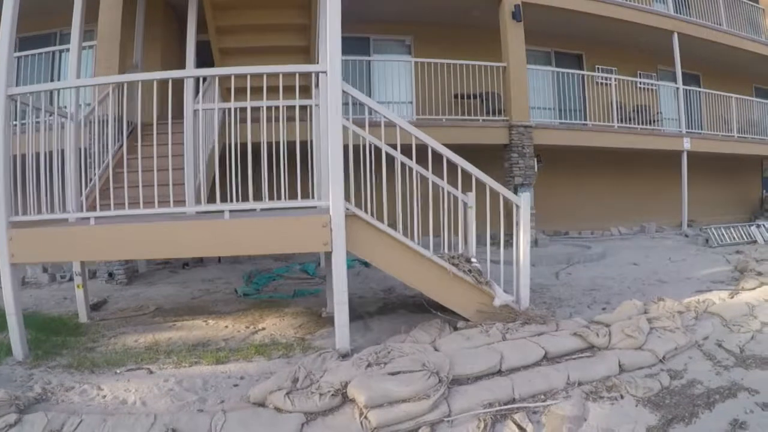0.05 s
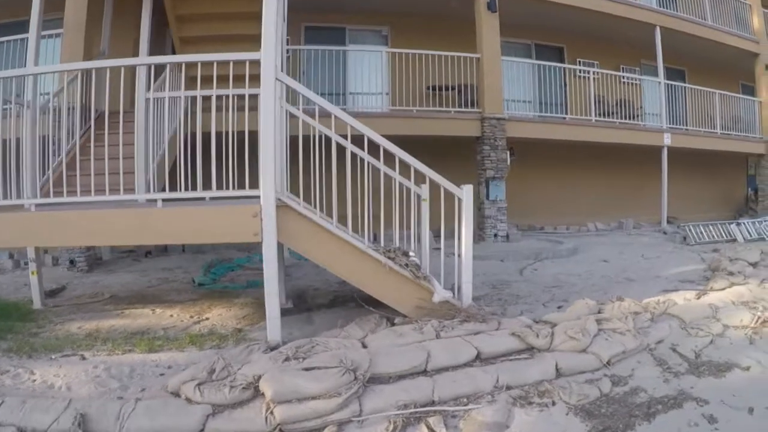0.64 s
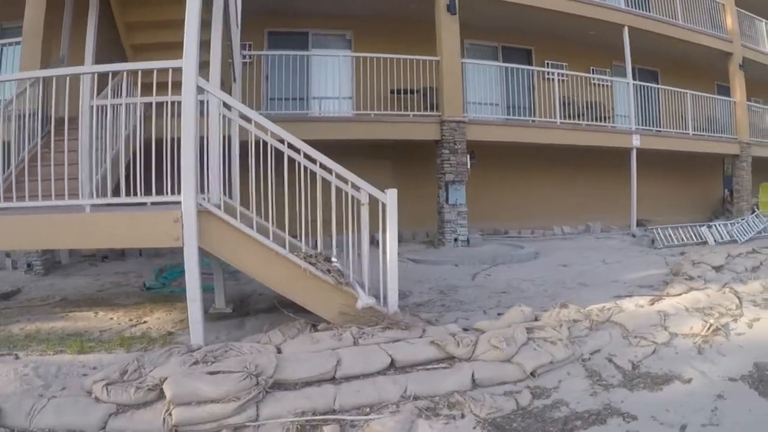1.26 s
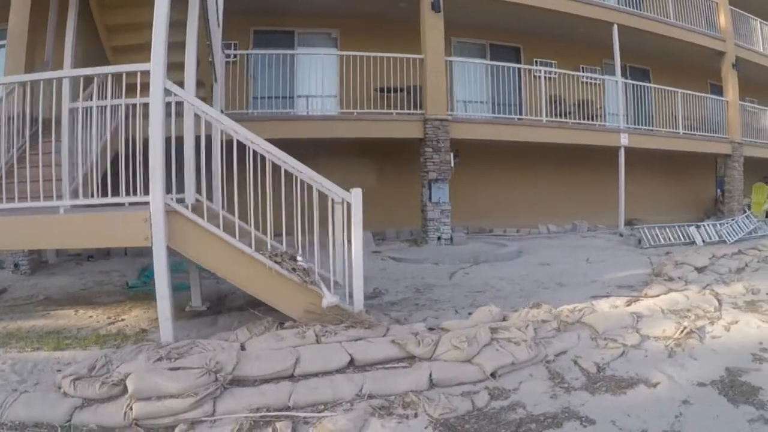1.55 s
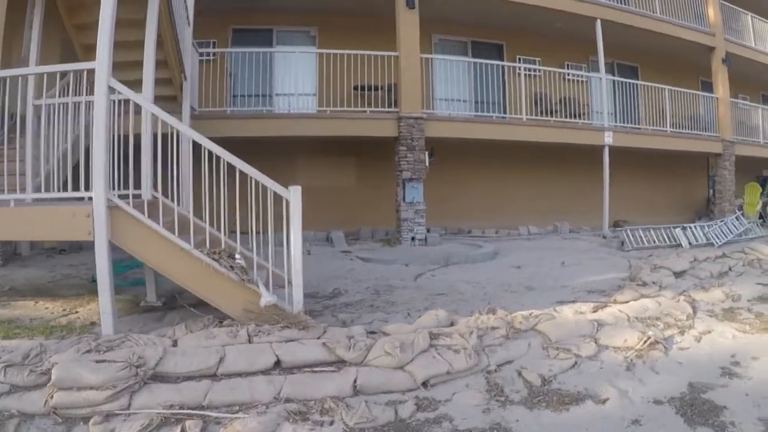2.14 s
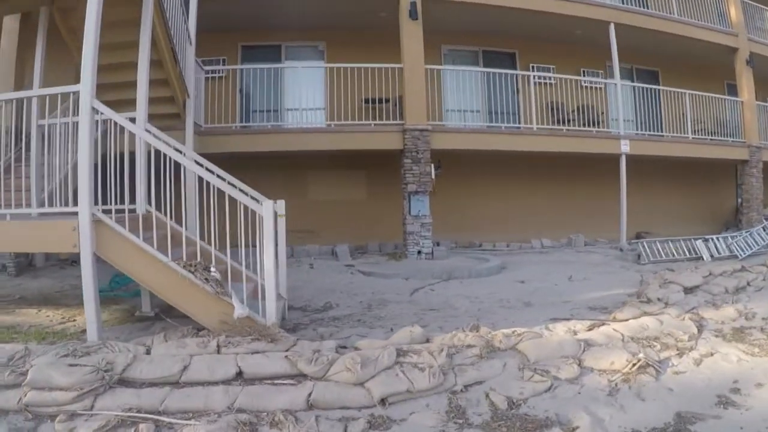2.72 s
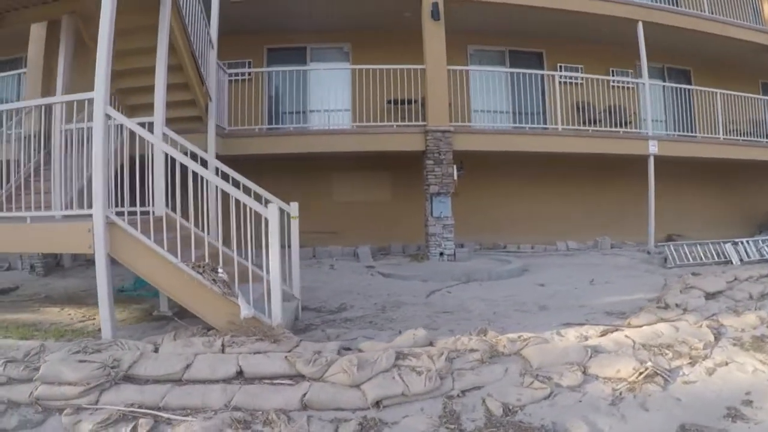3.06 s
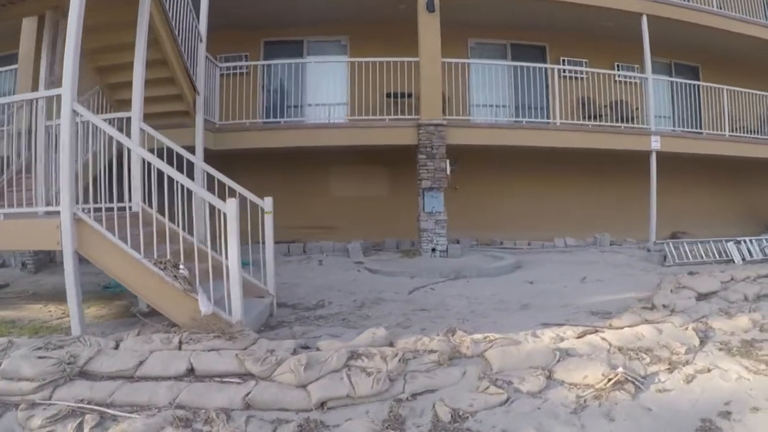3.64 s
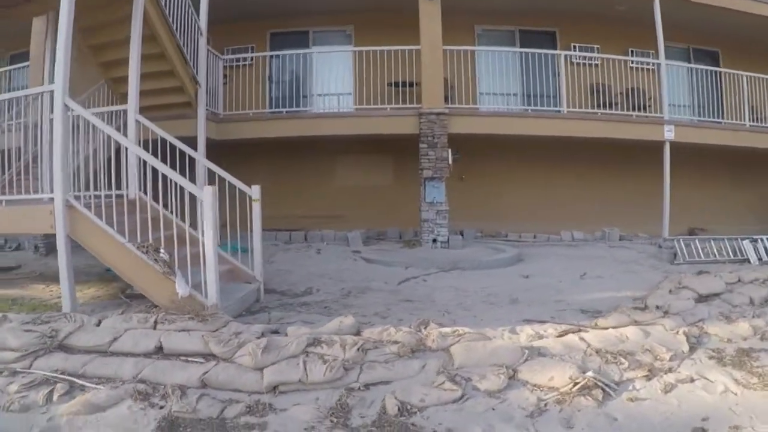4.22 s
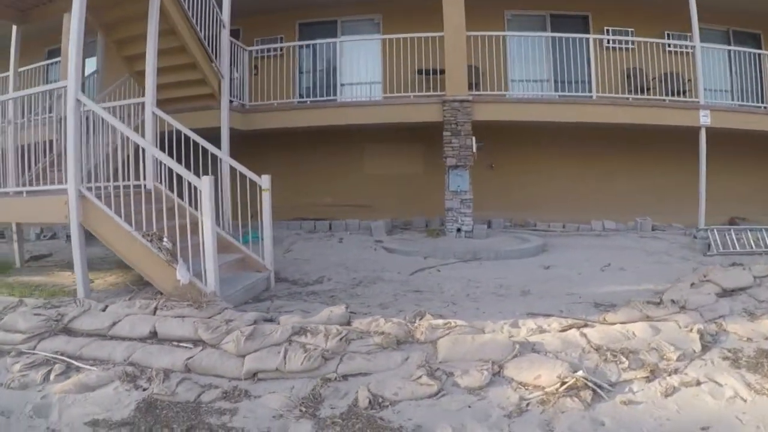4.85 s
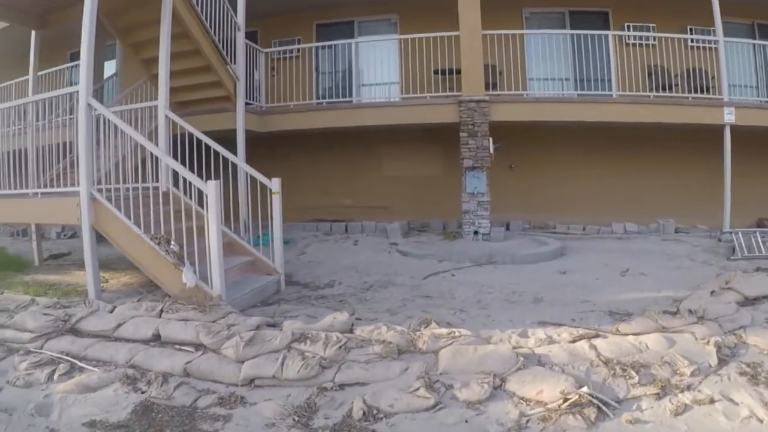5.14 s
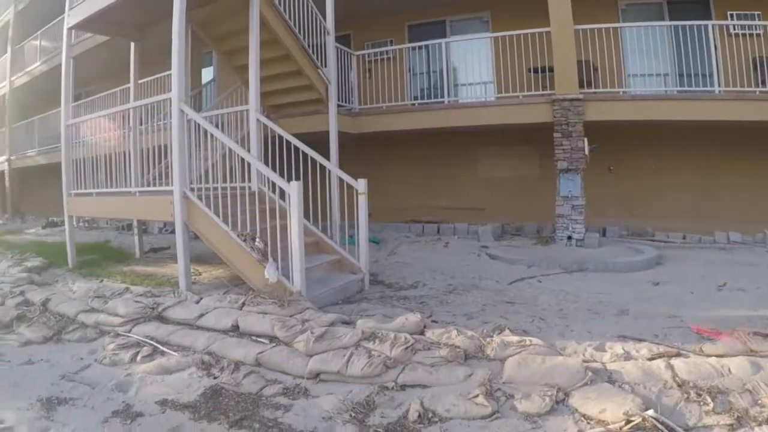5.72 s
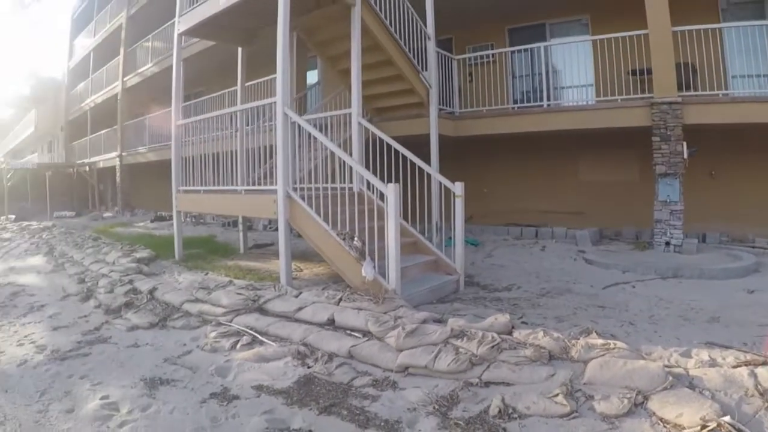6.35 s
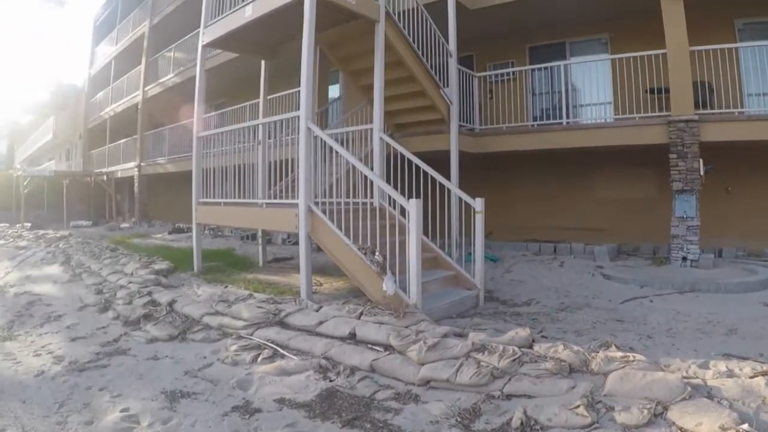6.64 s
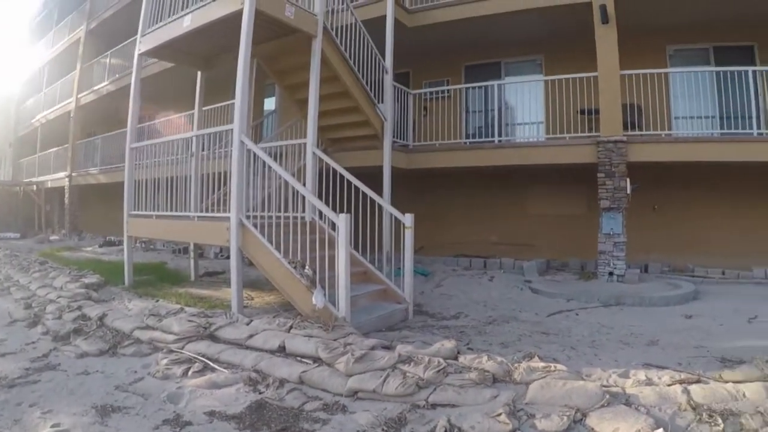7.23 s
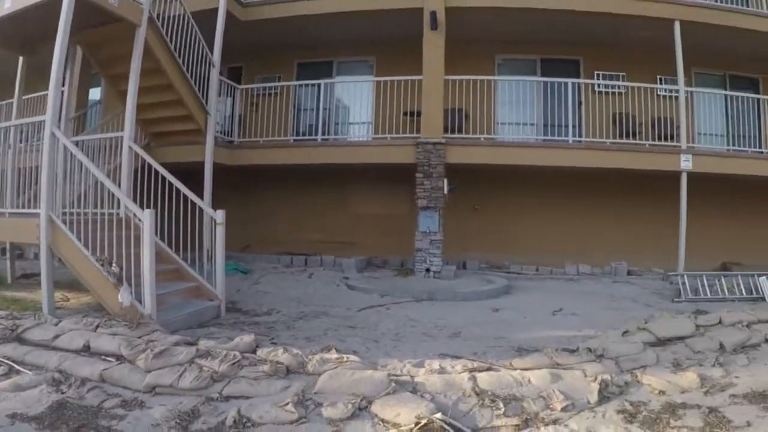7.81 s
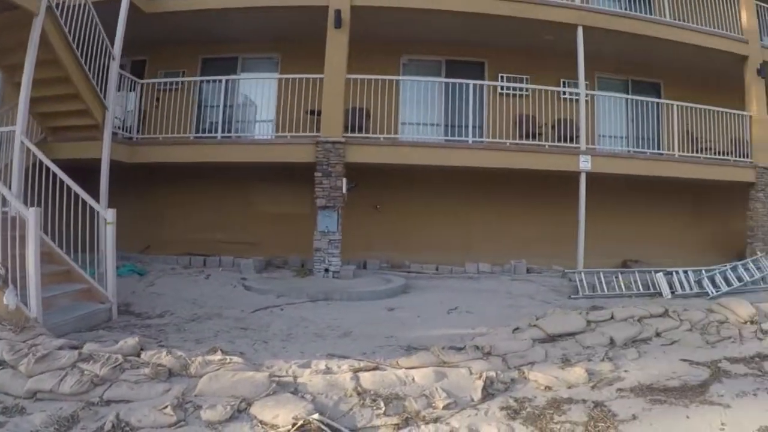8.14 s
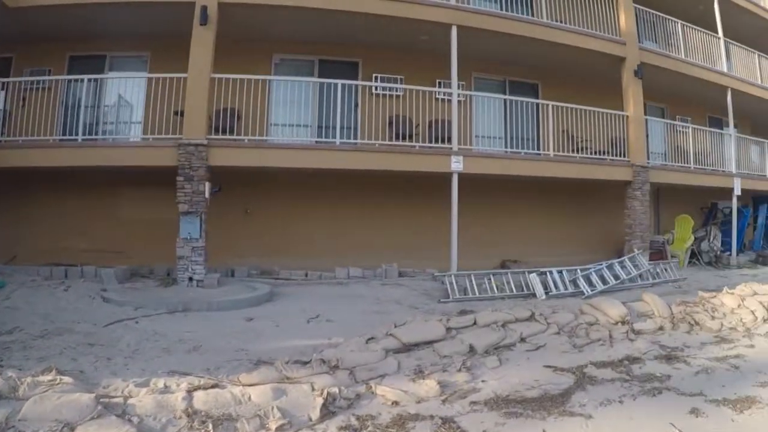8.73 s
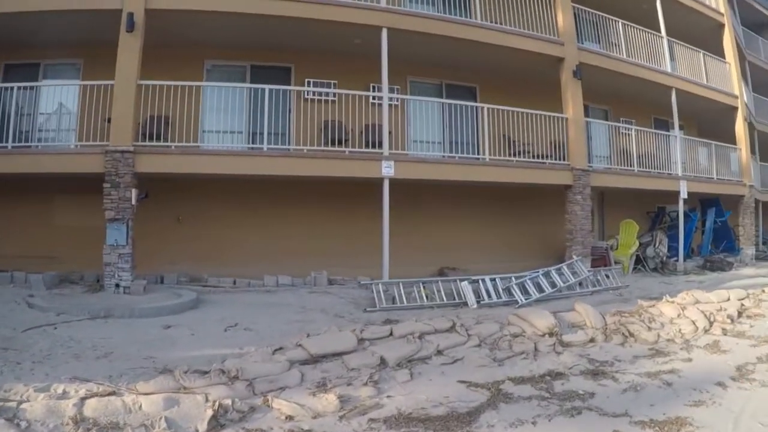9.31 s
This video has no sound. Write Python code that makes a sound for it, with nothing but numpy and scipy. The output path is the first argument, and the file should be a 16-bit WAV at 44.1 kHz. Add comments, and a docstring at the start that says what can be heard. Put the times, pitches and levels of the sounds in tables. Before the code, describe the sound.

Short rasping croaks recur steadily outdoors as gusts rumble and bump the microphone, with camera creaks and distant sea wash.

```python
"""A walk over sand in front of a beach building. From the start a dry rasp, most likely a tree frog, repeats on
the left at walking pace: quick pulses ring its throat and echo from the walls. Surf and a low drone lie behind,
and the camera's case creaks in the hand. After about two seconds the microphone starts to thump, wind rumbles
on it, and the case knocks. Past halfway, as a stronger gust arrives, a small bird twitters; then a farther one
pips five times."""
import sys
import numpy as np
from scipy import signal
from scipy.fft import rfft, irfft
from scipy.io import wavfile

SR = 44100
rng = np.random.default_rng(int(sys.argv[2]) if len(sys.argv) > 2 else 0)


def waveform_to_disk(signal):
    """Save audio, clipped to [-1, 1], as 16-bit WAV at the path in sys.argv[1]."""
    frames = np.transpose(np.atleast_2d(signal))
    scaled = np.clip(frames, -1, 1) * 32767
    samples = np.round(scaled).astype(np.int16)
    wavfile.write(sys.argv[1], SR, samples)


N = 413216
T = np.arange(N) / SR
HZ = np.maximum(np.fft.rfftfreq(N, 1 / SR), 1)

# The frog's calls, with a few soft answers between them: (start [s], length [s], level [dB],
# swell [dB], upward scrape [s], strongest ring [Hz], share sent to the walls [dB], sizzle [dB])
FROG_CALLS = [(-.09, 0.1, -41, 9.5, 0.054, 1770, 7, -61), (0.458, 0.12, -37.5, 3, .022, 1800, 3.5, -53),
              (1.093, 0.14, -38, 7, .06, 1900, 3, -54.5), (1.771, .128, -40, 4.5, 0.039, 2270, 3.5, -59),
              (2.187, 0.078, -48.5, 3, 0.015, 2050, -18, -75), (2.407, .12, -36, 3, 0.032, 2100, -1.5, -58),
              (2.843, 0.065, -48.5, 4, 0.019, 1980, -8, -75),
              (3.022, 0.12, -30.5, 7, 0.029, 2000, -3, -56.5),
              (3.612, 0.13, -33, 4.5, 0.029, 2050, -3.5, -58.5),
              (4.206, 0.12, -31, 5.5, 0.025, 2100, -4.5, -57),
              (4.784, 0.12, -31, 6, 0.027, 1900, -2.5, -57), (5.396, 0.12, -33, 3, .036, 1950, -3.5, -60.5),
              (5.993, .13, -31.5, 6, 0.034, 2010, -3.5, -59), (6.601, 0.13, -33.5, 5, .032, 2050, -2, -64),
              (7.193, 0.1147, -34, 2, 0.0057, 1900, -2.5, -67),
              (7.527, 0.087, -50.5, 4, 0.018, 2000, -4, -75),
              (7.782, .13, -33.5, 5.5, 0.056, 2090, -3.5, -62.5),
              (8.168, 0.092, -52, 3, .026, 2120, -9, -75), (8.396, 0.12, -35.5, 3.5, 0.025, 2040, -2, -66),
              (8.728, .14, -52.5, 3.5, 0.02, 1960, -10, -75), (8.972, 0.14, -37.5, 7, 0.034, 1980, 2, -64)]
# How the throat rings after one pulse: (frequency [Hz], level [dB])
THROAT_COLOUR = [(200, -31.5), (392, -1), (520, -13.5), (700, -12.5), (1050, -5), (1280, -9), (1405, 1.5),
                 (1550, -4), (1680, 2), (1820, 2.5), (2040, -1), (2200, -3), (2520, -7), (2850, -21),
                 (3350, -21.5), (4100, -32), (7000, -56), (12000, -89)]
# The walker turns away from the frog and back, shading the right ear: (time [s], loss [dB])
HEAD_SHADE = [(0, 35), (1.1, 41), (1.8, 26), (2.4, 13), (3.1, 8.5), (5.4, 33), (6, 20), (7.8, 31),
              (8.4, 10), (9.37, 15)]
# Airy hiss on a call: (frequency [Hz], level [dB])
WHEEZE_COLOUR = [(200, -18), (500, 7), (1200, 15), (1900, 0), (2800, 1), (3300, 0.5), (3700, -9.5),
                 (4200, -24), (10000, -49)]
# Thin, high sizzle on a call: (frequency [Hz], level [dB])
SIZZLE_COLOUR = [(3800, -22), (4400, -19.5), (5100, 0.5), (5450, -1.5), (5950, 1.5), (6400, -13.5),
                 (7200, -6), (10000, -39)]
# Tone of the echo from the walls: (frequency [Hz], level [dB])
WALL_COLOUR = [(250, -14), (900, 7), (1600, 1), (1900, -1), (2170, 6), (2600, -3), (3200, 6.5), (6000, 4.5),
               (10000, 5)]
# Tone of the sea: (frequency [Hz], level [dB])
SURF_COLOUR = [(40, -15), (112, -41), (150, -9), (230, 1), (290, -6.5), (500, -12), (650, -16),
               (1000, -18.5), (1450, -21.5), (2700, -28), (4300, -32.5), (7000, -31.5), (10500, -34.5),
               (14500, -49)]
# How wide the sea sounds: (frequency [Hz], spread [dB]).
# Spread is the level of the part opposed in the two ears against the part they share.
SURF_SPREAD = [(45, 2.5), (110, 1), (155, -14), (210, -7.5), (370, -4), (600, 4), (1260, 5), (2300, -1),
               (4200, -3), (7800, 0.5), (14000, 0.5)]
# Rise and fall of the sea's wash: (time [s], level before the boost [dB])
SURF_SWELL = [(0.0, -52), (2.27, -50), (5.22, -52), (5.56, -49.5), (6.99, -52), (7.93, -49.5), (8.61, -52),
              (9.37, -50)]
# Change in the middle tones of the wash: (time [s], gain [dB])
SURF_MID_GAIN = [(0, 2.5), (2.4, -0.5), (3.2, 0.22), (6.3, 0.2), (7.8, 0.06), (9.37, 1.9)]
# Noise bands of the low drone, plus a faint high one: (centre [Hz], width [Hz], level [dB], spread [dB])
DRONE_BANDS = [(154, 29, -51, -5.5), (156.9, 2.8, -53, -9), (178.2, 1.5, -58.5, -15),
               (191.7, 43, -54, -9.5), (379, 37, -65.5, -3), (6260, 380, -78, 1)]
# Rise and fall of the drone: (time [s], gain [dB])
DRONE_GAIN = [(0, 2.5), (1, 4), (3, 2), (4, 3.5), (5.7, 7.5), (6.5, 2), (7.5, 0.5), (8.9, 7), (9.37, 5)]
# The grip creaks on the camera's case: (start [s], length [s], level [dB])
GRIP_CREAKS = [(0.71, .028, -46), (1.923, 0.018, -37.5), (2.1, .018, -36), (2.124, .016, -39),
               (2.155, 0.049, -36), (2.215, .052, -35.5), (4.093, .018, -46), (5.463, .02, -42),
               (5.54, .022, -40), (5.774, 0.021, -44.5), (5.853, .016, -44), (5.893, 0.048, -40),
               (7.975, .04, -42), (8.01, .036, -46)]
# How the case rings: (frequency [Hz], level [dB])
CASE_COLOUR = [(200, -35), (550, -16), (780, -1.5), (950, 0.5), (1080, -3), (1220, -4), (1350, -18),
               (2200, -52), (7000, -100)]
# Low thumps on the microphone: (time [s], level [dB], final pitch [Hz], rise time [s])
MICROPHONE_THUMPS = [(1.846, -23.5, 173, 0.0041), (1.974, -25, 165, 0.0059), (2.073, -11, 305, .0016),
                     (2.083, -14, 200, 0.0068), (2.1005, -10, 160, 0.01), (2.202, -20.5, 228, 0.0036),
                     (2.22, -16, 111, 0.0049), (4.7275, -11, 169, 0.0062), (4.739, -7.5, 154, .0048),
                     (5.63, -16.5, 225, 0.0068), (5.728, -13.5, 190, 0.0049), (5.78, -13, 184, 0.0068),
                     (6.094, -12, 79, 0.0072), (6.158, -13, 76.6, 0.0066), (6.224, -12.5, 97, 0.0072),
                     (6.259, -15, 60, 0.015), (6.392, -10, 94.3, 0.0088), (6.404, -19, 186, 0.0046),
                     (6.422, -10, 108, 0.0074), (6.601, -7, 99, 0.0051), (7.458, -14.5, 56.6, .011),
                     (7.969, -19, 150, 0.0053), (8.034, -18, 194, 0.0058), (8.124, -17, 115, 0.0026),
                     (8.22, -12, 154, 0.0053)]
# A calm, one gust, a lull, a stronger gust: (time [s], level [dB])
WIND_LEVEL = [(0, -58), (.9, -62), (1.6, -69), (2.03, -61), (2.12, -42), (2.45, -37), (3.3, -42),
              (3.6, -40), (4.65, -50), (5.45, -48.5), (5.72, -33.5), (6.2, -36.5), (6.6, -30),
              (6.78, -34.5), (7.6, -38), (8.42, -36), (9.03, -43), (9.37, -39)]
# Tone of the wind's rumble: (frequency [Hz], level [dB])
WIND_COLOUR = [(10, -27), (22, -5.5), (42, 0.5), (70, -1), (100, -2), (150, -9), (220, -18.5), (350, -28),
               (700, -46.5), (2000, -81)]
# How wide the wind sounds: (frequency [Hz], spread [dB])
WIND_SPREAD = [(25, 8.5), (60, 2.5), (125, -4.5), (250, 3), (600, 3)]
# Knocks on the case: (time [s], level [dB], hollow low ring against the case's ring [dB])
CASE_KNOCKS = [(2.074, -18, 3.5), (2.106, -22, 8), (4.728, -26, 11.5), (4.739, -20, -14), (5.635, -28, 4),
               (5.726, -28, 3), (6.161, -30, -6), (6.394, -34, -2), (6.424, -32, -1), (6.597, -33, 9),
               (7.967, -32, 2), (8.04, -34, 6), (8.223, -29, -4), (8.322, -30, 1)]
# A small bird's notes:
# (start [s], length [s], first pitch [Hz], last pitch [Hz], hoarseness [Hz], level [dB])
TWITTER_NOTES = [(5.527, 0.11, 5500, 5830, 380, -54.5), (5.65, 0.049, 6130, 6430, 260, -56),
                 (5.84, 0.03, 5200, 4830, 500, -56), (5.848, .11, 3950, 4260, 700, -50.5),
                 (6.077, .15, 6070, 5960, 520, -50), (6.168, .15, 6000, 5900, 560, -58.5),
                 (6.103, 0.25, 7100, 6970, 700, -58), (6.79, .13, 8600, 9500, 280, -64),
                 (6.9, 0.22, 9150, 8700, 280, -65)]


def from_db(db):
    """Turn decibels into a number to multiply by."""
    return 10 ** (np.asarray(db) / 20)


def rms_one(x):
    """Scale a signal so that its average power is one."""
    return x / np.sqrt(np.mean(x ** 2) + 1e-20)


def in_time(points):
    """Join (time, value) points with straight lines, giving a value for every sample."""
    return np.interp(T, *np.transpose(points))


def colour(points):
    """Join (frequency, level) points into a gain for every frequency."""
    hz, db = np.transpose(sorted(points))
    return from_db(np.interp(np.log(HZ), np.log(hz), db))


def hump(hz, width_hz):
    """Gain that favours one frequency and falls away on both sides."""
    return 1 / (1 + ((HZ - hz) / (.75 * width_hz)) ** 2)


def filtered(x, gain):
    """Turn each frequency of a sound up or down by its gain."""
    return irfft(rfft(x) * gain, N)


def noise(gain):
    """Random noise of a given tone colour, with a power of one."""
    return rms_one(filtered(rng.standard_normal(N), gain))


def wide(gain, spread):
    """Noise from all around: one part shared by both ears and one part opposed in them."""
    side = gain * spread
    side_level = np.sqrt(np.sum(side ** 2) / np.sum(gain ** 2))
    return noise(gain) + noise(side) * side_level * np.array([[1], [-1]])


def ringing(gain):
    """A filter with this gain that rings only after it is struck, like a real object."""
    cepstrum = irfft(np.log(gain), N)
    cepstrum[1:N // 2] *= 2   # move what would come before the strike to after it
    cepstrum[N // 2 + 1:] = 0
    return np.exp(rfft(cepstrum))


def ticks(phase):
    """One click each time the count of cycles passes a whole number."""
    return np.diff(np.maximum.accumulate(np.floor(phase)), prepend=-1)


def ears(pan_db):
    """Left and right gains that average one; a positive pan favours the left."""
    gains = from_db(np.array([pan_db, -pan_db]).reshape(2, -1) / 2)
    return gains / gains.mean(axis=0)


def add(out, start_s, x):
    """Mix a short sound in at a given time."""
    at = round(start_s * SR)
    first, last = max(at, 0), min(at + x.shape[-1], N)
    if last > first:
        out[..., first:last] += x[..., first - at:last - at]


def gliding_peak(x, hz, width_hz):
    """Keep a narrow band of a sound while the band's centre moves."""
    carrier = np.exp(2j * np.pi * np.cumsum(hz) / SR)
    decay = np.exp(-np.pi * width_hz / SR)
    return 2 * np.real(signal.lfilter([1 - decay], [1, -decay], x / carrier) * carrier)


def frog_pulses(rate_hz, jitter_cycles=.06, rebound_cycles=.443, rebound_db=-6.5, hiss_db=-3):
    """Uneven clicks, each with a weaker rebound and a burst of rubbing; also returns a pulsing hiss."""
    chance = rng.standard_normal((64, 3))
    cycles = np.cumsum(rate_hz) / SR
    strength, timing, rebound_timing = chance[cycles.astype(int)].T
    phase = cycles - .5 + jitter_cycles * timing
    rebounds = ticks(phase - rebound_cycles + jitter_cycles * rebound_timing)
    clicks = (ticks(phase) + from_db(rebound_db) * rebounds) * 15.122   # brings their power near one
    white = rng.standard_normal((2, N // 20))[:, :len(cycles)]
    burst = rms_one(np.exp(-2.2 * (phase % 1)))
    pulses = (clicks + from_db(hiss_db) * burst * white[0]) * from_db(-.2 * strength)
    return pulses, white[1] * np.sqrt(burst)


def frog(lead_s=.008, swell_s=.072, release_s=.02, climb_hz=318, sand_s=.001577, right_lag_s=.000475):
    """Pulses ring the throat and scrape upward; returns the sound at the ears and at the walls."""
    throat = rms_one(colour(THROAT_COLOUR))
    rim = rms_one(throat ** .5 * hump(2380, width_hz=720))   # the bright edge of a call
    throat_ring, rim_ring = (irfft(ringing(throat) * g, N)[:SR // 50] for g in (1, rim / throat))
    calls, air = np.zeros((3, N)), np.zeros((2, N))
    for start, length, level_db, swell_db, scrape_s, peak_hz, echo_db, sizzle_db in FROG_CALLS:
        shade_db = np.interp(start, *np.transpose(HEAD_SHADE))
        t = np.arange(int((lead_s + length + release_s) * SR)) / SR - lead_s
        progress = t / length
        # pulses quicken through a call; calls that swell more are slower
        pulses, hiss = frog_pulses(rate_hz=192.85 + 11.25 * progress - swell_db)
        ring = throat_ring + from_db(-7.5 - .32 * shade_db) * rim_ring   # duller when turned away
        tone = signal.fftconvolve(pulses, ring)[:len(t)]
        tone += from_db(-3) * gliding_peak(tone, peak_hz + climb_hz * (progress - .5), width_hz=300)
        opening = np.sin(np.pi / 2 * np.clip(t / scrape_s, 0, 1))
        speed = .62 + .38 * opening   # the scrape: pitch and pulse rate slide up together
        tone = rms_one(np.interp(np.cumsum(speed), np.arange(len(t)), tone))
        fade_in = np.clip((t + lead_s) / (lead_s + .79 * scrape_s), 0, 1)
        swell = from_db(swell_db * (np.clip(t / swell_s, 0, 1) - 1))
        fade_out = np.clip((length - t) / release_s + .5, 0, 1)
        effort = fade_in * swell * fade_out
        paths_db = np.array([[0], [-shade_db], [echo_db]])   # left ear, right ear, walls
        add(calls, start - lead_s, tone * effort * from_db(level_db + paths_db))
        if level_db > -46:   # only full calls wheeze and sizzle
            wheeze_db = -46 - .98 * start   # fades as the walk goes on
            add(air, start - lead_s, hiss * effort * opening * from_db([[wheeze_db], [sizzle_db]]))
    sand_bounce = 1 + from_db(-9) * np.exp(-2j * np.pi * HZ * sand_s) * hump(0, 2100)
    wheeze = rfft(air[0]) * rms_one(colour(WHEEZE_COLOUR))
    sizzle = rfft(air[1]) * rms_one(colour(SIZZLE_COLOUR))
    left, right, outward = rfft(calls) * sand_bounce + wheeze + sizzle
    right *= np.exp(-2j * np.pi * HZ * right_lag_s)
    return irfft([left, right], N), irfft(outward, N)


def wall_echoes(x, fade_60db_s=.56, first_s=.00062, build_s=.00057, front_delay_s=.085):
    """Echoes scatter off the balconies and die away; the building's front sends back one ringing echo."""
    age = np.maximum(T[:SR] - first_s, 0)
    tail = rng.standard_normal((2, SR)) * (1 - np.exp(-age / build_s)) * from_db(-60 * age / fade_60db_s)
    tail /= np.sqrt(np.sum(tail ** 2, axis=1, keepdims=True))
    scattered = signal.fftconvolve(filtered(x, colour(WALL_COLOUR))[None], tail, axes=1)[:, :N]
    front = filtered(x, hump(2190, width_hz=170) * np.exp(-2j * np.pi * HZ * front_delay_s))
    return (from_db(-9.5) * scattered + from_db(-8.5) * front) * ears(pan_db=1.5)


def surf(boost_db=4, waver_db=1.1, hiss_from_hz=2500, hiss_db=-48.5):
    """The wash of the sea swells and wavers while its high hiss stays even."""
    sea = wide(colour(SURF_COLOUR), colour(SURF_SPREAD))
    body = filtered(sea, 1 / (1 + (HZ / hiss_from_hz) ** 4))
    mid_change = filtered(body, hump(900, width_hz=500)) * (from_db(in_time(SURF_MID_GAIN)) - 1)
    level_db = in_time(SURF_SWELL) + boost_db + waver_db * noise(hump(0, 26))
    return (body + mid_change) * from_db(level_db) + (sea - body) * from_db(hiss_db)


def drone(lowest_hz=132):
    """Narrow bands of noise hum behind the surf, with the deepest bass cut away."""
    bass_cut = 1 / np.sqrt(1 + (lowest_hz / HZ) ** 16)
    bands = sum(from_db(level_db) * wide(hump(hz, width_hz) * bass_cut, from_db(spread_db))
                for hz, width_hz, level_db, spread_db in DRONE_BANDS)
    return bands * from_db(in_time(DRONE_GAIN))


def tap(gain):
    """The short ring of something tapped once, with a peak of one."""
    ring = irfft(ringing(gain), N)[:SR // 50]
    return ring / np.max(np.abs(ring))


def through_case(x, right_db=-2, lag_s=.00007):
    """The case shakes the two microphone openings in opposite ways, the right one weaker and later."""
    return np.array([x, -from_db(right_db) * np.interp(T - lag_s, T, x)])


def creaks(slips_per_s=500, jitter_cycles=.3):
    """The hand's grip gives way in runs of tiny, uneven slips that ring the camera's case."""
    out, case = np.zeros(N), tap(colour(CASE_COLOUR))
    for start, length, level_db in GRIP_CREAKS:
        t = T[:int(length * SR)]
        chance = rng.standard_normal((64, 2))
        timing, strength = chance[(t * slips_per_s).astype(int)].T
        slips = ticks(t * slips_per_s + jitter_cycles * timing) * strength
        fade = np.sqrt(np.sin(np.pi * t / length))
        creak = rms_one(signal.fftconvolve(slips, case)[:len(t)] * fade)
        add(out, start, creak * from_db(level_db))
    return out


def thumps(droop=.38, droop_s=.003, right_db=-7, lag_cycles=.43):
    """A thump strikes the left opening, then the sheltered right: a short swing falling in pitch."""
    out, t = np.zeros((2, N)), T[:SR // 8]
    for start, level_db, hz, rise_s in MICROPHONE_THUMPS:
        age = t / rise_s
        phase = 2 * np.pi * hz * (t + droop * droop_s * (1 - np.exp(-t / droop_s)))
        swing = (age * np.exp(1 - age)) ** 2 * np.sin(phase)
        add(out[0], start, swing * from_db(level_db))
        add(out[1], start + lag_cycles / hz, swing * from_db(level_db + right_db))
    return out


def wind(left_db=2.5, veer_db=2.5, lumpy_db=2):
    """Swirling air rumbles on the microphone openings, favouring the left and veering at random."""
    pan_db = left_db + veer_db * noise(hump(0, 4.9))
    rumble = wide(colour(WIND_COLOUR), colour(WIND_SPREAD))
    level_db = in_time(WIND_LEVEL) + lumpy_db * noise(hump(0, 2.4))
    return rumble * ears(pan_db) * from_db(level_db)


def knocks():
    """Each knock rings the camera's case along with a lower, hollow note."""
    case, hollow = tap(colour(CASE_COLOUR)), tap(hump(500, width_hz=290) ** 2)
    out = np.zeros(N)
    for start, level_db, hollow_db in CASE_KNOCKS:
        add(out, start, (case + from_db(hollow_db) * hollow) * from_db(level_db))
    return out


def bird_note(length, first_hz, last_hz, width_hz, steadiness=.64):
    """A short gliding whistle that wobbles at random: the wider it is, the hoarser it sounds."""
    progress = np.linspace(0, 1, int(length * SR))
    phase = 2 * np.pi * np.cumsum(first_hz + (last_hz - first_hz) * progress) / SR
    smooth = signal.butter(2, width_hz / 2, fs=SR, output="sos")
    a, b = signal.sosfilt(smooth, rng.standard_normal((2, 2, SR // 2)))[..., -len(progress):]
    whistle = (a * np.cos(phase) + b * np.sin(phase)) / np.hypot(a, b) ** steadiness
    return rms_one(whistle) * np.sqrt(4 * progress * (1 - progress))


def birds(pips_from_s=6.87, pip_every_s=.176, pip_hz=3550, pip_db=-63.5):
    """A little to the right, one bird twitters; a farther one follows with five even pips."""
    out = np.zeros((2, N))
    for start, length, first_hz, last_hz, width_hz, level_db in TWITTER_NOTES:
        add(out, start, bird_note(length, first_hz, last_hz, width_hz) * from_db(level_db))
    for k in range(5):
        pip = bird_note(.1, pip_hz, pip_hz, width_hz=160)
        add(out, pips_from_s + k * pip_every_s, pip * from_db(pip_db))
    return out * ears(pan_db=-2.5)


def scene():
    """Mix the animals, the camera's case, the background and the wind."""
    rasps, toward_walls = frog()
    animals = rasps + wall_echoes(toward_walls) + birds()
    handling = through_case(creaks() + knocks())
    background = (surf() + drone()) * ears(pan_db=.03)
    return animals + handling + background + thumps() + wind()


def record(dry, cutoff_hz=14900):
    """Cut the highest treble away steeply."""
    return signal.sosfilt(signal.ellip(10, .1, 80, cutoff_hz, fs=SR, output="sos"), dry)


dry = scene()
out = record(dry)
waveform_to_disk(out)
```